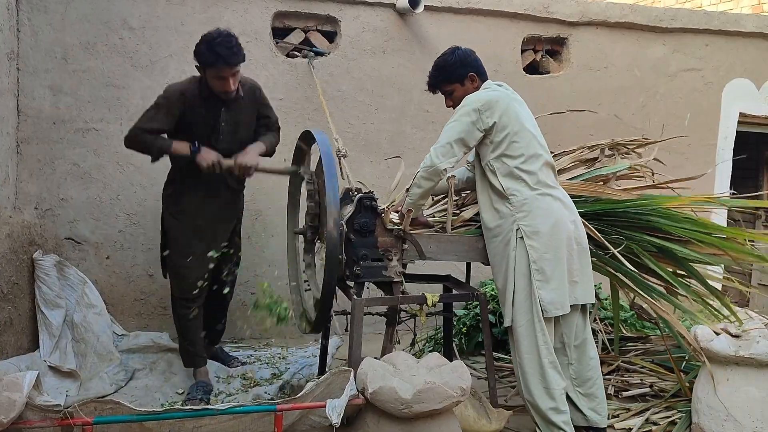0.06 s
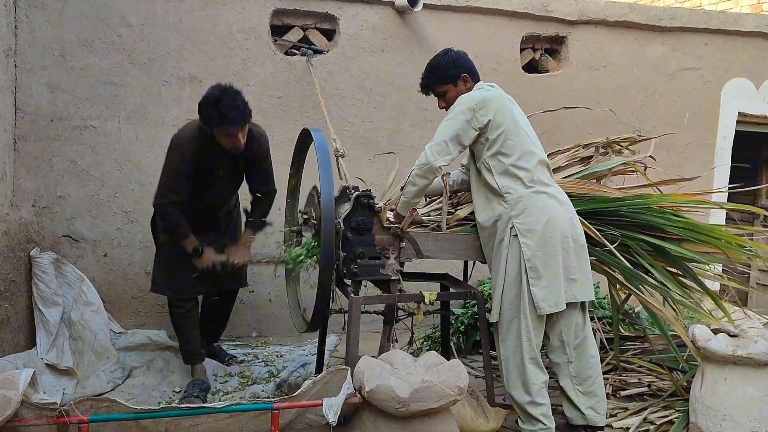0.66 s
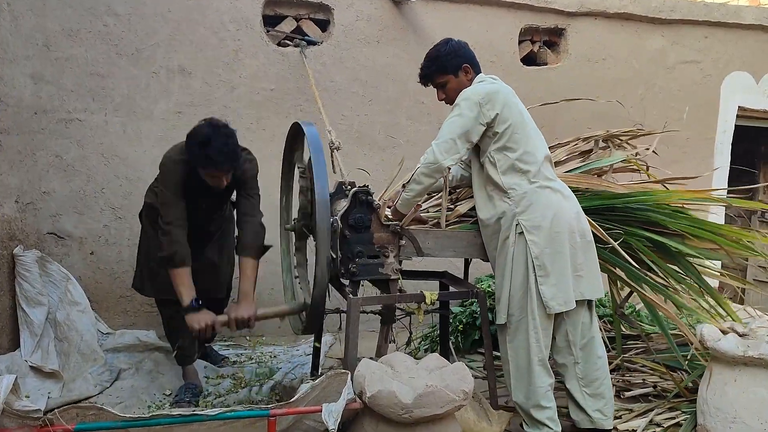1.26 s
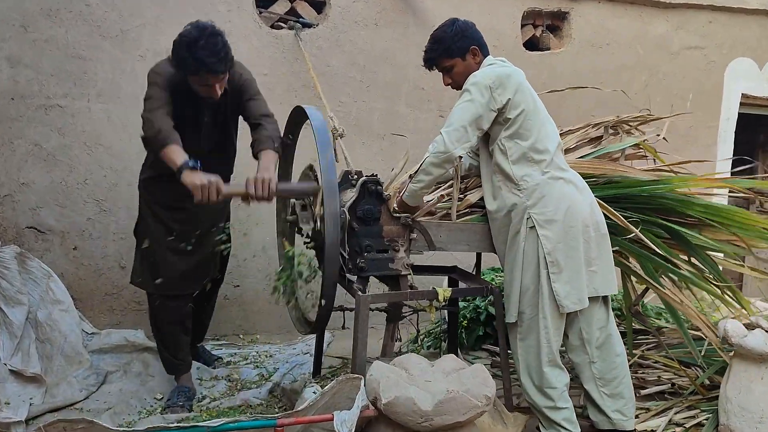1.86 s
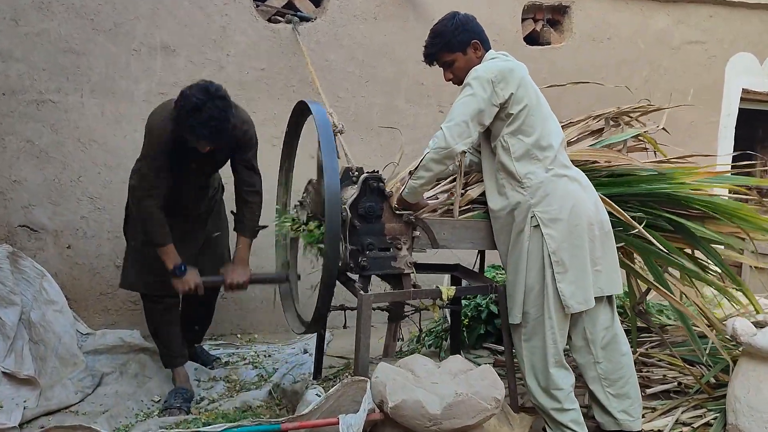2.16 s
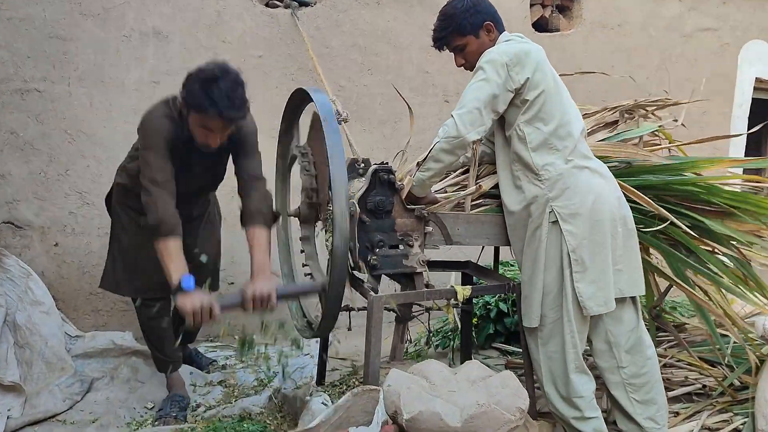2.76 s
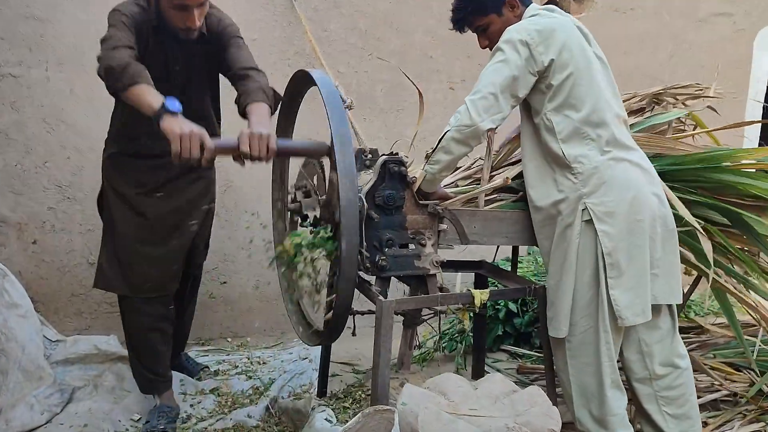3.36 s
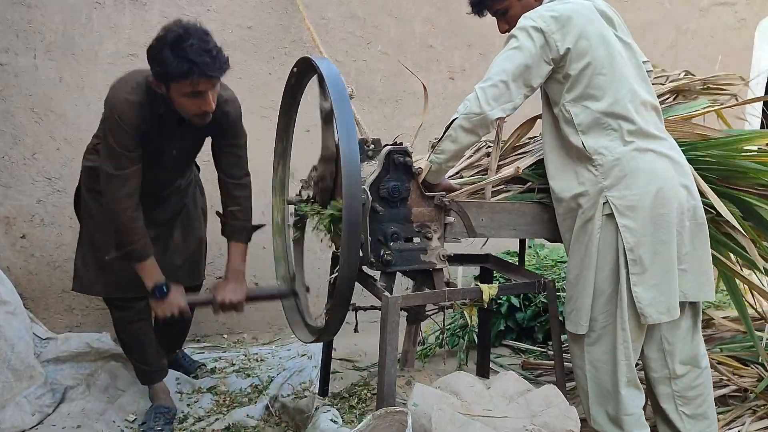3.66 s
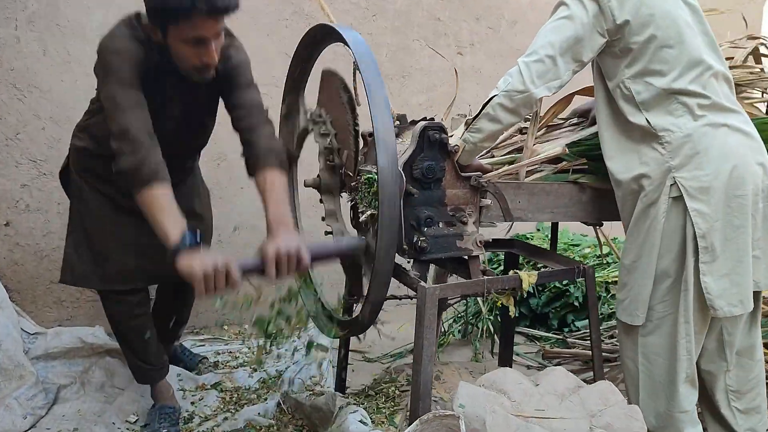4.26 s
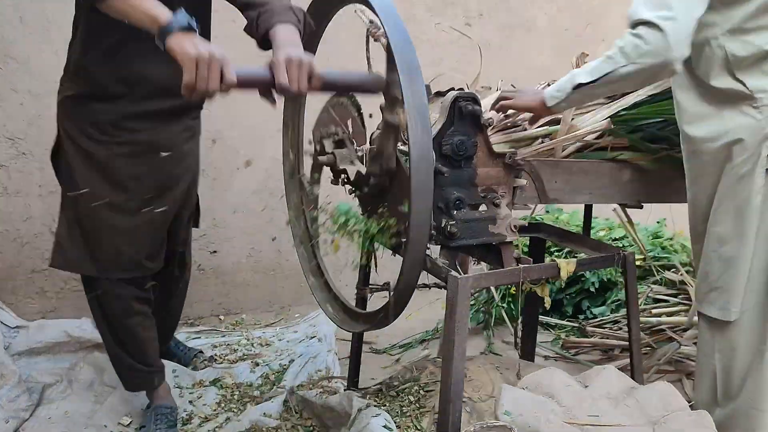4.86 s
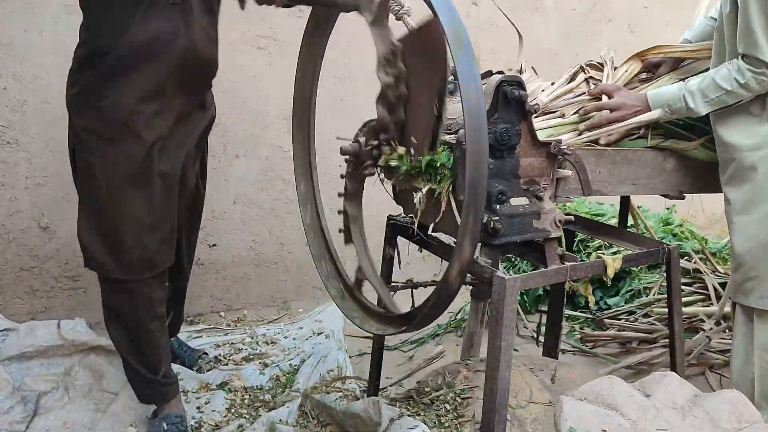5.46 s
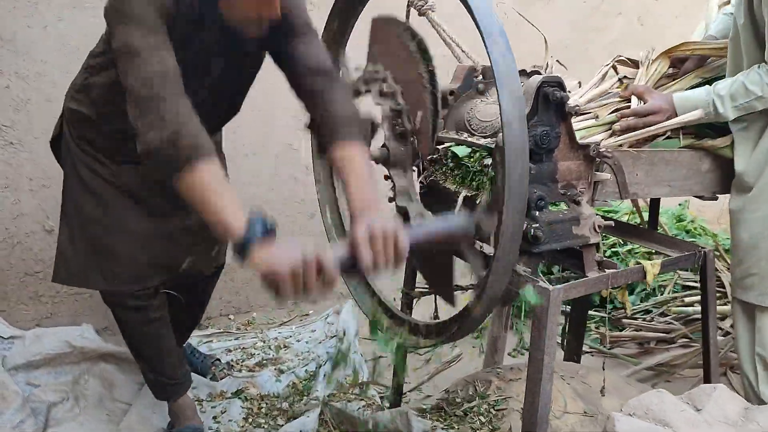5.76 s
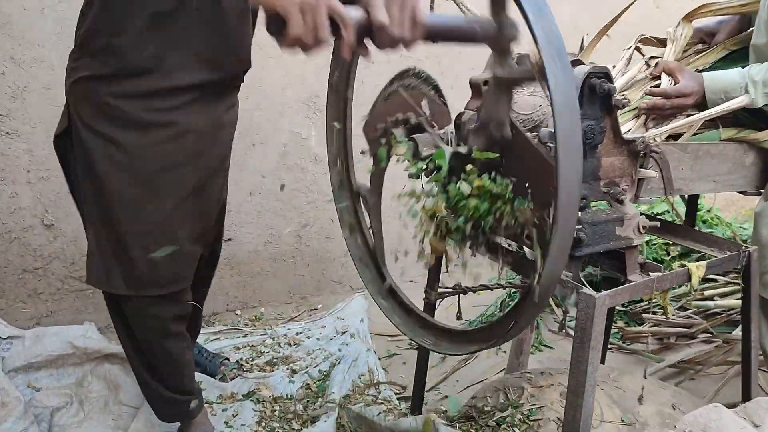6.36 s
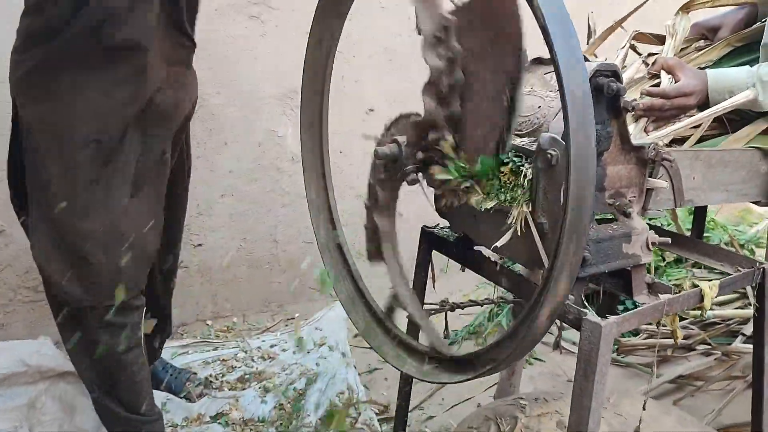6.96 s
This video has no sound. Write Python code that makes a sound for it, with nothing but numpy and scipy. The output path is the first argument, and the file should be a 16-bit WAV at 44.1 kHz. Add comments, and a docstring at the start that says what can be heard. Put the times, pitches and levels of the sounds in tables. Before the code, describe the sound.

Flywheel blades slice through leafy stalks with rhythmic crunches and knocks, with faint rustling and gear rumble between cuts.

```python
"""A hand-cranked flywheel chaff cutter chops green fodder in a walled yard.
Its two blades pass in turn, one quick, one slow. Each cut is a shower of small fractures, bright from
fibres and low from hollow stalks, ending in a knock as the last stalks break against the shear plate.
The cuts excite the modes of the iron frame, and the walls reflect the sound. Between cuts the rollers
drag rustling, sometimes squeaking leaves forward over the rumble of the gears."""
import sys
import numpy as np
from scipy import signal
from scipy.fft import rfft, irfft
from scipy.io import wavfile
from scipy.ndimage import uniform_filter1d, minimum_filter1d

SR = 44100
rng = np.random.default_rng(int(sys.argv[2]) if len(sys.argv) > 2 else 0)


def store_wav(level_fs):
    """Save 16-bit WAV to argv[1]."""
    pcm = np.round(np.clip(np.atleast_2d(level_fs), -1, 1) * 32767)
    wavfile.write(sys.argv[1], SR, pcm.T.astype(np.int16))


N = 308700
T = np.arange(N) / SR
CUTOFF_HZ = 14400

# Levels in all tables are relative; each source sets its own gain.
# blade passes: (entry [s], breakthrough [s], fibre crackle [dB], stalk crunch [dB], knock [dB])
CUTS = [(-.11, -0.022, -21, -32, -10), (0.235, 0.33, -17, -19, -11.5), (0.657, 0.728, -18.5, -19.5, -9.5),
        (0.987, 1.082, -16.5, -20, -12.5), (1.413, 1.483, -20.5, -24.5, -8.5),
        (1.753, 1.848, -14.5, -18.5, -9), (2.196, 2.268, -15.5, -19.5, -9.5),
        (2.531, 2.624, -13.5, -18, -9.5), (2.956, 3.026, -12, -17.5, -8),
        (3.297, 3.388, -15.5, -18.5, -11.5), (3.73, 3.797, -16.5, -23.5, -11.5),
        (4.057, 4.149, -14.5, -21, -15), (4.488, 4.561, -14.5, -21.5, -14.5), (4.812, 4.9, -14, -21.5, -16),
        (5.224, 5.295, -20.5, -25, -12.5), (5.566, 5.66, -15.5, -21.5, -14.5),
        (5.997, 6.064, -16.5, -22.5, -11.5), (6.316, 6.412, -16.5, -19, -12),
        (6.749, 6.817, -16.5, -20, -11)]
# spectrum of a parting fibre: (frequency [Hz], level [dB])
FIBRE_SPECTRUM = [(300, -45.5), (1000, -13.5), (1800, -14.5), (2600, -10), (4000, -8), (5700, -5.5),
                  (6700, -2.5), (7350, 1), (8300, -7), (9600, -17), (11500, -25.5), (14500, -33.5)]
# spectrum of a bursting stalk: (frequency [Hz], level [dB])
STALK_SPECTRUM = [(40, -32.5), (100, -33), (220, -15), (320, -1.5), (480, -1), (620, 0), (820, -0.5),
                  (1150, -9), (1600, -22.5), (3000, -18), (8000, -69)]


def slicing():
    """Acoustic emission: outer leaves tear, then fine fibres part, each releasing its strain as a click."""
    # spectrum of tearing leaves: (frequency [Hz], level [dB])
    tear_spectrum = [(4000, -24), (9000, 0), (12000, 0.5), (14500, -5.5)]
    enter, _, entry_db, _, _ = np.transpose(CUTS)
    load = blade_load(entry_db, late_crackle_db(), last_snap_db(), lead_s=0.048, lead_db=-9,
                      rise_s=0.0075, trail=0.42, trail_db=-4.5, release_s=0.059)
    crackle = load * fractures(per_s=4000, spread_db=3.2, clump_db=1, clumps_per_s=260)
    outer_leaves = bursts(enter - 0.05, np.zeros(len(enter)), t60=0.53)
    tearing = load * outer_leaves * fractures(per_s=6000, spread_db=2, clump_db=1, clumps_per_s=200)
    return from_db(-1.5) * colour(crackle, FIBRE_SPECTRUM) + from_db(-13) * colour(tearing, tear_spectrum)


def crunching():
    """Fracture of whole stalks: sparser, lower clicks, under a load that also makes the blade plate clang."""
    # level of the blade's clang, louder in the later cuts: (time [s], level [dB])
    clang_levels = [(0, -5.5), (3.0, -17), (3.7, -2), (7, -3)]
    # spectrum of the plate's clang: (frequency [Hz], level [dB])
    plate_spectrum = [(300, -34.5), (700, -2), (900, 5), (1200, 2.5), (1600, -5), (3000, -16.5)]
    _, _, entry_db, crunch_db, knock_db = np.transpose(CUTS)
    thinning_db = 0.42 * (late_crackle_db() - entry_db)
    load = blade_load(crunch_db + 1.5, crunch_db + 3 + thinning_db, knock_db - 2, lead_s=0.041,
                      lead_db=-16.5, rise_s=0.011, trail=0.34, trail_db=-6, release_s=0.09)
    breaks = load * fractures(per_s=1800, spread_db=3.5, clump_db=1, clumps_per_s=99)
    clang_gain = from_db(np.interp(T, *np.transpose(clang_levels)))
    clang = clang_gain * load * fractures(per_s=2000, spread_db=-1.5, clump_db=2, clumps_per_s=140)
    return from_db(-3.5) * (colour(breaks, STALK_SPECTRUM) + colour(clang, plate_spectrum))


def knocks(rebound_s=0.0075):
    """Impact: the bundle gives way against the shear plate with a blow, a rebound, a judder and a snap."""
    # spectrum of the blow: (frequency [Hz], level [dB])
    knock_spectrum = [(30, -32.5), (110, -23.5), (240, -10), (340, -2.5), (520, 3.5), (780, -8), (1150, -8),
                      (1600, -28), (2500, -10), (4000, -43), (9000, -43)]
    _, through, _, _, knock_db = np.transpose(CUTS)
    blow = through + 0.001706
    thuds = strike(blow, knock_db + 5, knock_spectrum)
    thuds += strike(blow + rebound_s, knock_db - 6.5, knock_spectrum)
    contacts = fractures(per_s=2500, spread_db=1.5, clump_db=0.3, clumps_per_s=700)
    judder = bursts(through, knock_db - 2, t60=0.099) * contacts
    snap = bursts(blow, last_snap_db() - 2.5, t60=0.076) * rng.standard_normal(N)
    return thuds + colour(judder, knock_spectrum) + colour(snap, FIBRE_SPECTRUM)


def blade_load(entry_db, late_db, snap_db, lead_s, lead_db, rise_s, trail, trail_db, release_s):
    """Amplitude envelope of the cuts: leaves brushed, bundle sliced, last stalks snapped, stragglers."""
    out = np.zeros(N)
    for (enter, through, *_), first, late, snap in zip(CUTS, entry_db, late_db, snap_db):
        gentle = ((through - enter) / 0.09) ** 2  # a slow pass eases in, a fast one bites at once
        clear = through + trail * (through - enter)
        times = [enter - lead_s * gentle, enter - rise_s * gentle, enter + rise_s * gentle,
                 through, through + 0.0027, clear, clear + release_s]
        levels = [-55, first + lead_db, first, late, snap, snap + trail_db, -60]
        during = (T > times[0]) & (T < times[-1])
        out[during] += from_db(np.interp(T[during], times, levels))
    return out


def late_crackle_db(usual_cut_s=0.079, sag_db_per_s=127):
    """Emission follows cutting force: a pass ends more quietly in a thin bundle or with a slow blade."""
    # fullness of the bundle, as the crackle late in a cut: (time [s], level [dB])
    bundle_levels = [(0, -17.5), (2, -16), (3.8, -20), (5, -24), (5.8, -27), (6.3, -24), (6.8, -23.5)]
    enter, through, *_ = np.transpose(CUTS)
    sag_db = sag_db_per_s * (through - enter - usual_cut_s)
    return np.interp(through, *np.transpose(bundle_levels)) - sag_db


def last_snap_db(mean_db=-14.5, share=0.52):
    """Common excitation: the snap of the last fibres follows a share of the knock's swing in level."""
    knock_db = np.transpose(CUTS)[4]
    return mean_db + share * (knock_db - knock_db.mean())


def hollow(x, depth_db, stalks_per_s, bands=26):
    """Cavity resonance: each hollow stalk favours its own pitches, so bands swell and fade at random."""
    spectrum = rfft(x)
    band_position = (bands - 1) * np.sqrt(np.minimum(np.fft.rfftfreq(N, 1 / SR) / CUTOFF_HZ, 1))
    out = np.zeros(N)
    for k in range(bands):
        band = irfft(spectrum * np.maximum(1 - np.abs(band_position - k), 0), N)
        gain = from_db(depth_db * np.clip(drift(stalks_per_s), -2, 2))
        out += band * gain / np.sqrt(np.mean(gain ** 2))
    return out


def frame(force, level_db):
    """Modal ringing: every fracture excites the damped natural vibrations of the iron."""
    # modes of stand, frame and blades: (frequency [Hz], level [dB], T60 [s])
    iron_modes = [(160.8, 10, 0.28), (191, 6, 0.24), (333, -10.5, 0.46), (471.5, -4, 0.15), (576, 1, 0.076),
                  (760, 1, 0.1), (912, 7, 0.13), (981, -11.5, 0.59), (2449, 3, 0.25), (2740, 3, 0.14),
                  (3560, -35, 0.14), (4043, -26, 0.23)]
    t = T[:SR]
    ring = sum(from_db(db - 60 * t / t60) * np.sin(2 * np.pi * hz * t) for hz, db, t60 in iron_modes)
    return from_db(level_db) * convolve(force, ring)


def feed(swing_db=1.5, peak_turn=0.16):
    """Friction and crushing: leaves rustle into the rollers, swelling once a turn; single stalks crack."""
    # rustle of leaves dragged along the trough: (time [s], level [dB])
    drag_levels = [(0, -46), (3.0, -42.5), (4.1, -33), (4.9, -40.5), (5.8, -34.5), (6.6, -41.5), (7, -40)]
    # thick tufts crushed in the rollers: (start [s], end [s], level [dB])
    tufts = [(1.94, 1.977, -39), (2.516, 2.547, -19), (3.238, 3.3, -36), (3.42, 3.92, -28),
             (5.323, 5.453, -38.5), (5.522, 5.59, -23)]
    # stalks cracking in the rollers or under the blade: (time [s], level [dB])
    cracks = [(.641, -30), (0.69, -14), (1.772, -15), (2.359, -24.5), (2.594, -6.5), (2.888, -33),
              (3.21, -25.5), (3.852, -19), (4.41, -36), (4.71, -40), (5.067, -42), (5.155, -24),
              (6.21, -25.5)]
    # spectrum of the rustle: (frequency [Hz], level [dB])
    rustle_spectrum = [(400, -20.5), (1500, -9.5), (3000, -10), (5000, -5.5), (6300, -0.5), (7200, 3.5),
                       (8500, -9), (10500, -15), (14500, -27)]
    through = np.transpose(CUTS)[1]
    wheel_turns = np.interp(T, through, np.arange(len(through)) / 2)  # two passes make one turn
    swell_db = swing_db * np.cos(2 * np.pi * (wheel_turns - peak_turn))
    drag = from_db(np.interp(T, *np.transpose(drag_levels)) + swell_db)
    for start, end, db in tufts:
        on = (T > start) & (T < end)
        drag[on] += from_db(db) * np.sqrt(np.sin(np.pi * (T[on] - start) / (end - start)))
    grain = fractures(per_s=2500, spread_db=5, clump_db=2.8, clumps_per_s=110)
    splinters = bursts(*np.transpose(cracks), t60=0.025) * rng.standard_normal(N)
    return from_db(-7) * colour(drag * grain, rustle_spectrum) + colour(splinters, FIBRE_SPECTRUM)


def squeaks():
    """Stick-slip friction: a wet leaf on the iron rollers gives a rough tone that sinks."""
    # squeaks: (start [s], end [s], first frequency [Hz], last frequency [Hz], level [dB])
    glides = [(3.087, 3.11, 7100, 6870, -34), (5.35, 5.439, 7070, 5600, -28.5),
              (5.512, 5.553, 7020, 6860, -21)]
    out = np.zeros(N)
    waver_hz, grip = 550 * drift(1800), drift(900)
    for start, end, first_hz, last_hz, db in glides:
        on = (T > start) & (T < end)
        progress = (T[on] - start) / (end - start)
        hz = first_hz + (last_hz - first_hz) * progress + waver_hz[on]
        tone = np.sin(2 * np.pi * np.cumsum(hz) / SR)
        out[on] += from_db(db) * np.sin(np.pi * progress) * grip[on] * tone
    return out


def slack(delay_s=0.094, level_db=-32.5):
    """Backlash: after each slow cut the drive takes up its slack and shakes the stalks in a dull rattle."""
    starts = np.transpose(CUTS)[1, 1::2] + delay_s
    shake = bursts(starts, np.full(len(starts), level_db), t60=0.18)
    contacts = fractures(per_s=1500, spread_db=2, clump_db=2.5, clumps_per_s=120)
    return colour(shake * contacts, STALK_SPECTRUM)


def gears(rise_s=0.0035):
    """Contact noise: the worm and rollers rumble steadily; soft impacts clunk, each at its own pitch."""
    # spectrum of the running drive: (frequency [Hz], level [dB])
    rumble_spectrum = [(25, -4), (90, -6.5), (170, 7), (320, 10.5), (560, 7.5), (1000, 4.5), (1600, -0.5),
                       (4000, -6), (9000, -39)]
    # clunks of gears, crank and thick stems: (time [s], frequency [Hz], level [dB])
    clunks = [(1.640, 530, -33.5), (1.676, 1530, -36.5), (2.594, 590, -21), (3.008, 690, -13),
              (5.066, 584, -37), (5.166, 620, -37), (5.866, 480, -36), (6.591, 536, -39)]
    contacts = fractures(per_s=5800, spread_db=4, clump_db=0.4, clumps_per_s=30)
    out = colour(from_db(-51.5) * contacts, rumble_spectrum)
    rattle, waver = 1 + 0.5 * drift(220), 1 + 0.3 * drift(900)
    for start, hz, db in clunks:
        on = (T >= start) & (T < start + 0.1)
        age = (T[on] - start) / rise_s
        swell = age * np.exp(1 - age)
        tone = np.sin(2 * np.pi * np.cumsum(hz * waver[on]) / SR)
        out[on] += from_db(db) * swell * rattle[on] * tone
    return out


def yard(x, first_echo_s, octaves=8):
    """Reverberation: echoes between ground and walls decay exponentially, each octave at its own rate."""
    # reverberation time: (frequency [Hz], T60 [s])
    decay_times = [(150, 0.08), (500, 0.3949), (2000, 0.24), (7000, 0.29), (14000, 1.3)]
    # strength of the echoes: (frequency [Hz], level [dB])
    echo_levels = [(150, -10.5), (500, -17), (2000, -6.5), (7000, -17), (14000, -25.5)]
    t, response = T[:SR], np.zeros(SR)
    onset = np.clip(t / first_echo_s - 1, 0, 1)
    for hz in 100 * 2. ** np.arange(octaves):
        band = signal.butter(2, [hz / np.sqrt(2), hz * np.sqrt(2)], "band", fs=SR, output="sos")
        echoes = signal.sosfilt(band, rng.standard_normal(SR))
        decay = unit_energy(from_db(-60 * t / at_hz(decay_times, hz)) * onset)
        response += from_db(at_hz(echo_levels, hz)) * echoes * decay
    return convolve(x, response)


def spread(x):
    """Stereo width by decorrelation: the sound is centred, with a wide, shimmering treble."""
    # spectrum of the left-right difference: (frequency [Hz], level [dB])
    side_spectrum = [(80, -50), (350, -74), (750, -77), (1300, -58), (3400, -71), (4400, -33.5),
                     (7000, -8.5), (14000, -6.5)]
    t = T[:SR]
    smear = unit_energy(rng.standard_normal(SR) * np.exp(-t / 0.005) * (t > 0.001))
    phase_shift = np.exp(1j * np.pi * drift(40))
    decorrelated = np.real(phase_shift * signal.hilbert(convolve(x, smear)))
    side = convolve(decorrelated, pulse(side_spectrum))
    return np.array([x + side, x - side])


def fractures(per_s, spread_db, clump_db, clumps_per_s):
    """Shot noise: randomly timed clicks of uneven size, swelling in clumps; rms 1."""
    size_db = spread_db * np.clip(rng.standard_normal(N), -2, 2)
    size_db += clump_db * np.clip(drift(clumps_per_s), -2, 2)
    clicks = from_db(size_db) * rng.choice([-1, 1], N) * (rng.random(N) < per_s / SR)
    return clicks / np.std(clicks)


def bursts(times, level_db, t60):
    """Exponential decay: an envelope that jumps by each level and dies away."""
    out = np.zeros(N)
    for s, db in zip(times, level_db):
        start = np.searchsorted(T, s)
        out[start:] += from_db(db - 60 * np.minimum((T[start:] - s) / t60, 2))
    return out


def strike(times, level_db, spectrum):
    """Impulse excitation: one pulse at each time, peaking at its level."""
    clicks, shape = np.zeros(N), pulse(spectrum)
    for s, db in zip(times, level_db):
        if 0 <= s * SR < N:
            clicks[int(s * SR)] += from_db(db)
    return convolve(clicks, shape / np.abs(shape).max())


def drift(per_s):
    """Random modulation: interpolated noise of standard deviation 1."""
    return np.interp(T * per_s, np.arange(N), rng.standard_normal(N)) * np.sqrt(3 / 2)


def colour(x, spectrum):
    """Spectral shaping: white clicks or noise take on a spectrum at the same power."""
    return convolve(x, unit_energy(pulse(spectrum)))


def pulse(spectrum, size=4096):
    """Minimum phase: the shortest causal response with this spectrum."""
    magnitude = from_db(at_hz(spectrum, np.fft.rfftfreq(size, 1 / SR)))
    cepstrum = irfft(np.log(magnitude))
    cepstrum[1:size // 2] *= 2
    cepstrum[size // 2 + 1:] = 0
    return irfft(np.exp(rfft(cepstrum)))[:size // 2]


def convolve(x, response):
    """Linear filtering by an impulse response."""
    return signal.fftconvolve(x, response)[:N]


def unit_energy(response):
    """Normalisation: the response keeps the power of white noise."""
    return response / np.sqrt(np.sum(response ** 2))


def at_hz(points, hz):
    """Interpolation of a table on a log-frequency axis."""
    table = np.array(points)
    return np.interp(np.log(np.maximum(hz, 1)), np.log(table[:, 0]), table[:, 1])


def from_db(db):
    """Decibels to amplitude ratio."""
    return 10 ** (np.asarray(db) / 20)


def scene():
    """Superposition: the cutting, the ringing iron and the drive add to their echoes from the yard."""
    leaves = hollow(slicing() + feed(), depth_db=3.2, stalks_per_s=70)
    stalks = hollow(crunching(), depth_db=3, stalks_per_s=25, bands=48)
    cutting = leaves + stalks + knocks()
    machine = cutting + frame(cutting, level_db=-59.5) + squeaks() + gears() + slack()
    return spread(machine + yard(machine, first_echo_s=0.0053))


def record(dry):
    """Peak limiting: one fast gain holds both channels within full scale, then a low-pass cuts the top."""
    window = 45  # samples, about 1 ms
    allowed_gain = 1 / np.maximum(np.abs(dry).max(axis=0), 1)
    gain = uniform_filter1d(minimum_filter1d(allowed_gain, window), window)
    lowpass = signal.ellip(10, 0.1, 70, CUTOFF_HZ, fs=SR, output="sos")
    return signal.sosfilt(lowpass, dry * gain)


dry = scene()
out = record(dry)
store_wav(out)
```